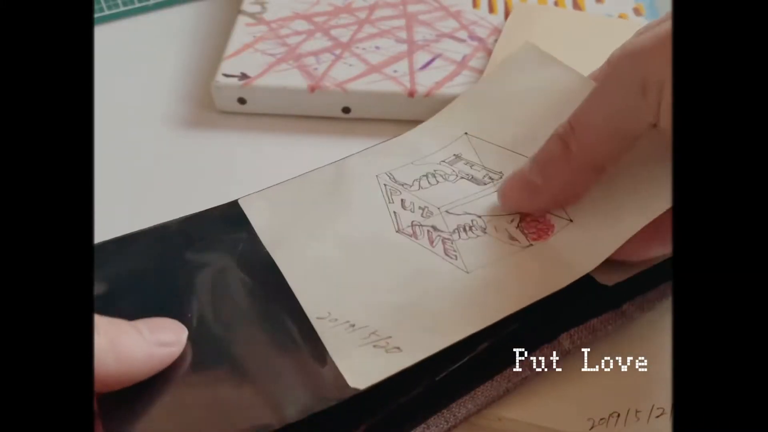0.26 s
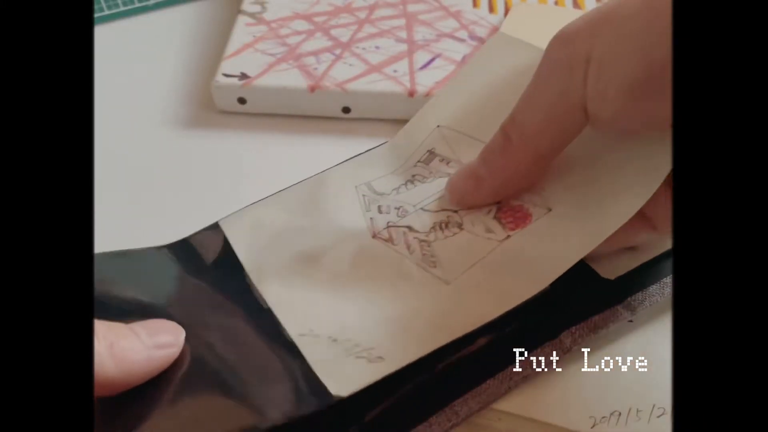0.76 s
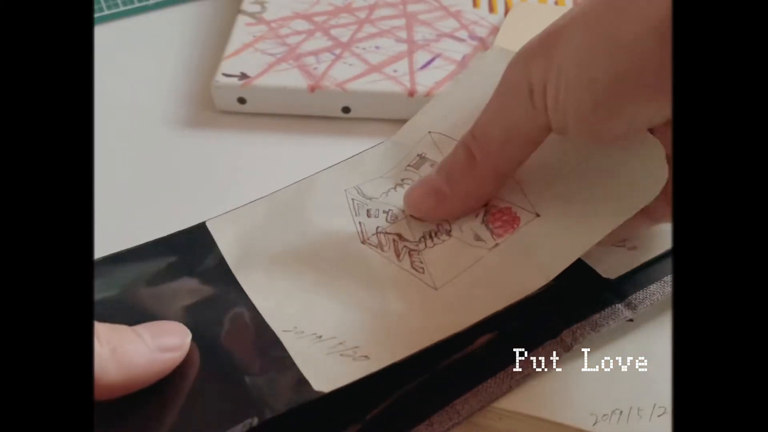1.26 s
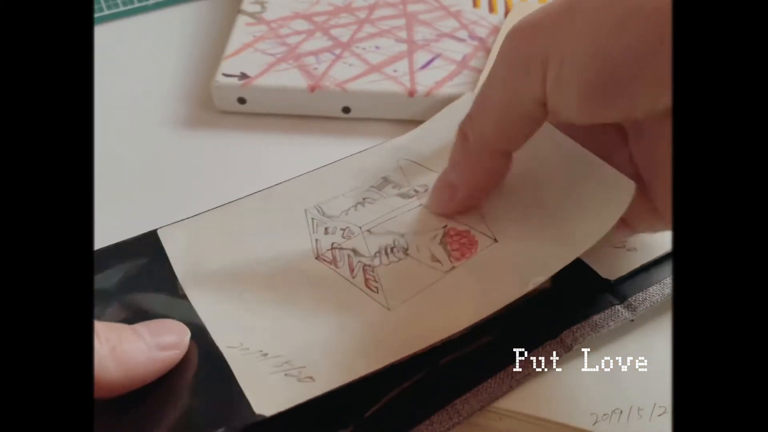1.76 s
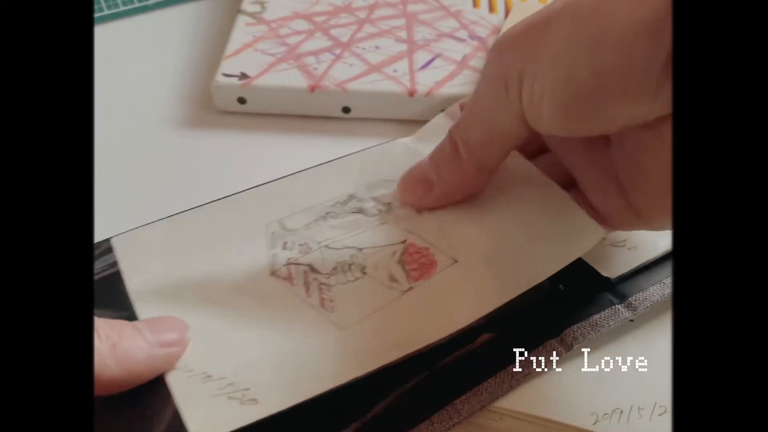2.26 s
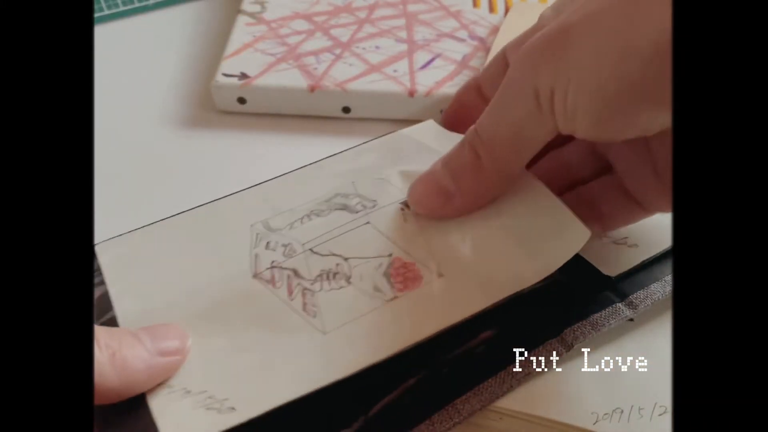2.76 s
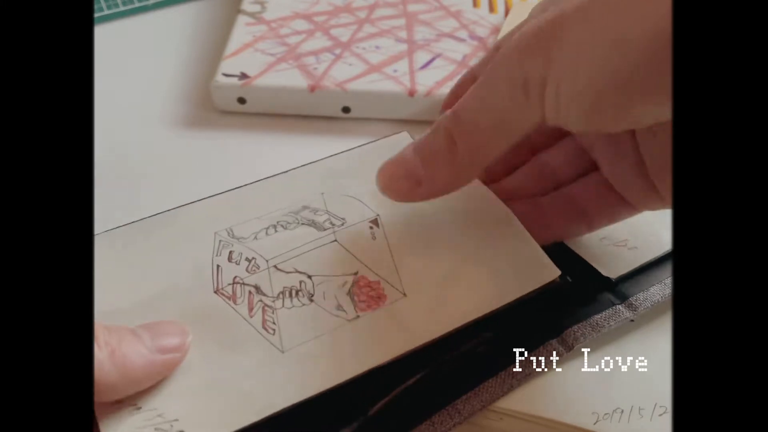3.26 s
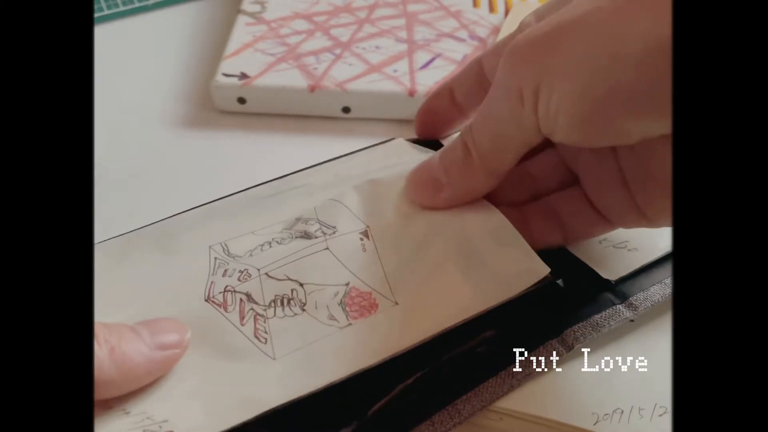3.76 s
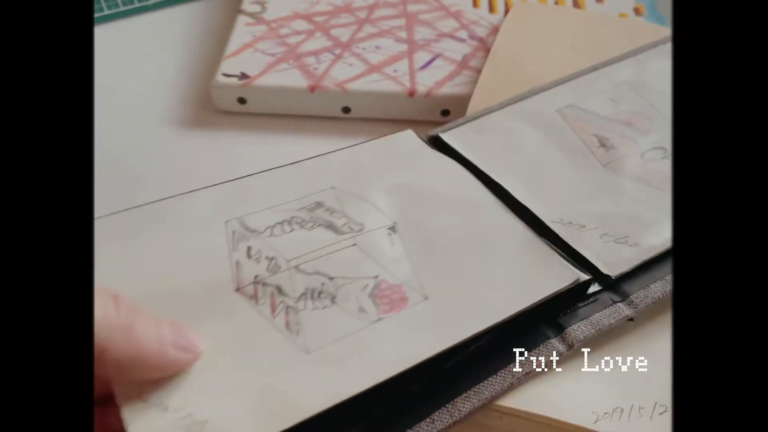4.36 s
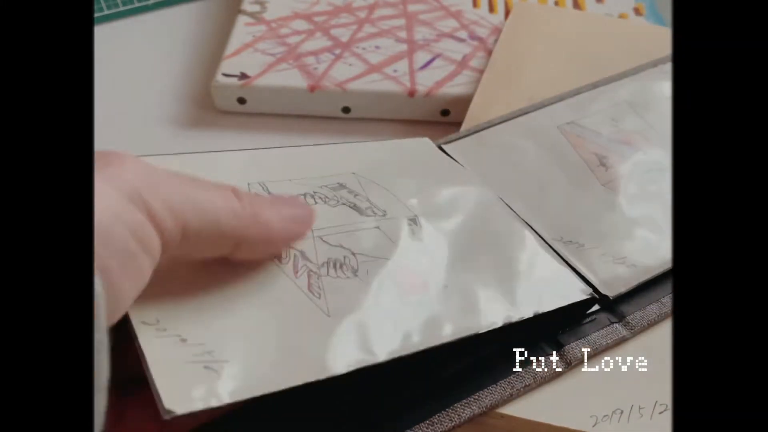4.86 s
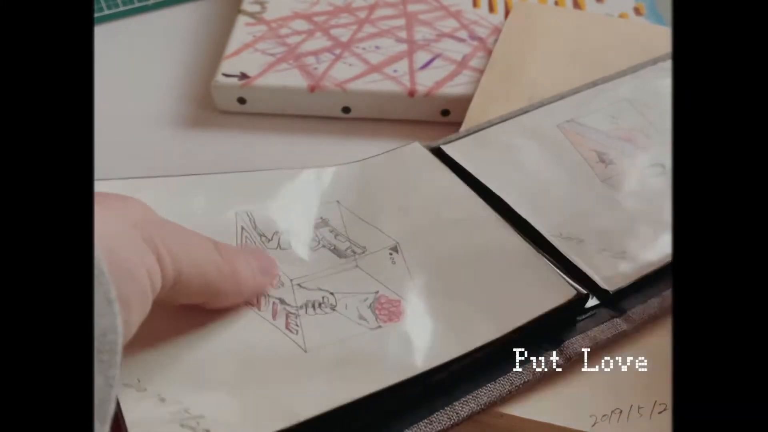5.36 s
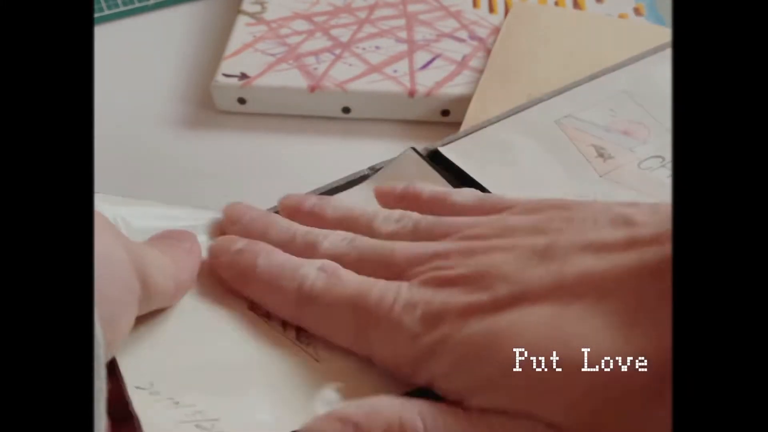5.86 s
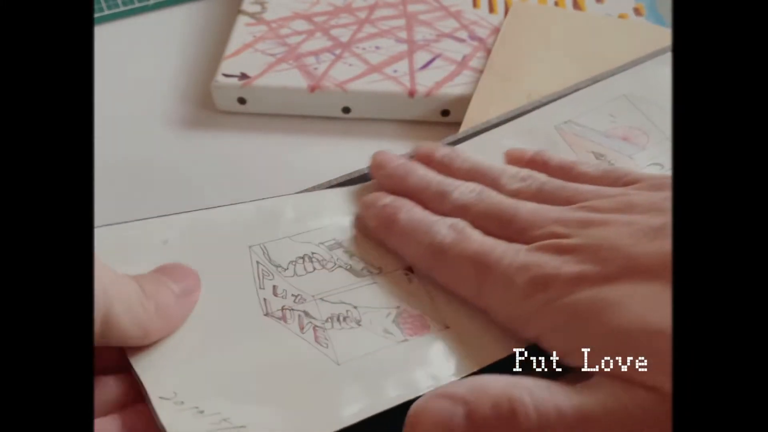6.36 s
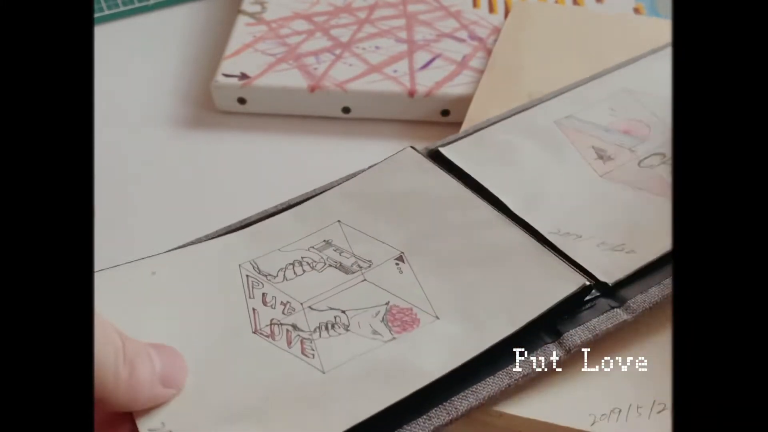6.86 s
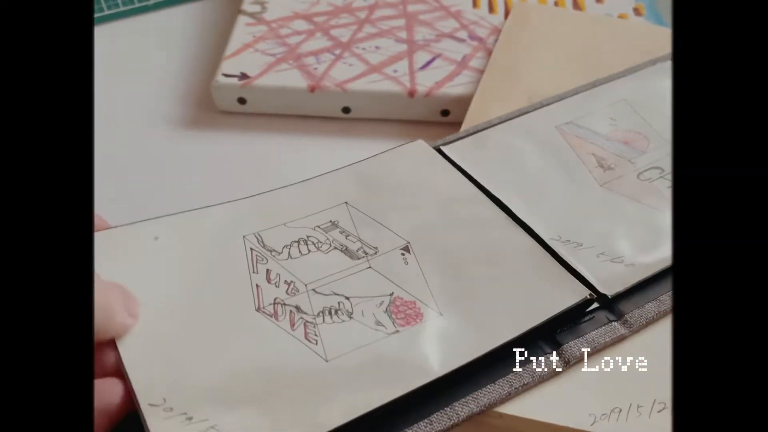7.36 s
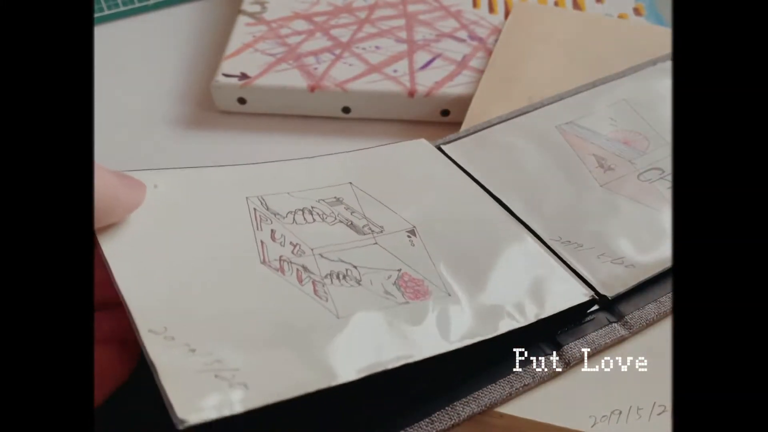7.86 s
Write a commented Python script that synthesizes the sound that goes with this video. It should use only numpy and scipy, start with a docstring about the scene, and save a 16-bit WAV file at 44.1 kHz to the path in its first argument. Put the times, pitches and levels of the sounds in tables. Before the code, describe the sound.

A close stereo microphone hears paper handling on a table in a quiet room, over an uneven low motor hum and a faint, high insect whirr from far outside. A short rustle opens, then from 0.3 s sharp creases snap among dry, scratchy slides, loudest around 0.4, 1.15 and 1.25 s. Irregular pushes and crackles continue to about 2.8 s, then thin out, with snaps near 3.15 and a crisp one at 3.63 s, and a few more until 4.1 s. A soft knock falls at 4.5 s, light ticks near 5 s, and a firmer dull tap at 5.35 s. Pressing rustles follow from 5.7 s; a bright palm swish swells from 6.1 to 6.46 s, stopping with a knock. Another tap and faint brush come near 6.75 s. Afterwards mostly hum remains, with a tiny rising squeak at 7.25 s, one weak tick at 7.6 s and faint rapid insect clicking until 8 s.

```python
"""Paper sheet into an album sleeve

Close by on a table, hands slide a paper sheet into a plastic album sleeve, then smooth it flat.
Creases snap as short bursts with three rings; grains and friction through paper resonances make the rustle.
Knocks ring the album's low modes; a palm swish, a soft brush and a faint squeak are shaped noise and tone.
A motor hums in harmonics over room noise, and insects far outside whirr as band noise with one clicking caller.
Two microphone ports a few centimetres apart hear the near sounds with a phase shift between them."""
import sys
import numpy as np
from scipy import signal
from scipy.fft import rfft, irfft, next_fast_len
from scipy.io import wavfile

SR = 44100
rng = np.random.default_rng(int(sys.argv[2]) if len(sys.argv) > 2 else 0)


def store_wav(level_fs):
    """Save 16-bit WAV to argv[1]."""
    pcm = np.round(np.clip(np.atleast_2d(level_fs), -1, 1) * 32767)
    wavfile.write(sys.argv[1], SR, pcm.T.astype(np.int16))


N = 357210

# left-right balance of the room: (frequency [Hz], left over right [dB])
AIR_BALANCE = [(60, -3.5), (200, -5.5), (380, -2), (700, -.5), (1300, 0), (15000, 0)]
DULL_HZ, BRIGHT_HZ = 2200, 7500   # borders between dull, main and bright parts
SIDES = np.array([[1], [-1]])   # sign of a left-right difference: left, right


def amp(db):
    """Gain of a level in dB."""
    return 10 ** (np.asarray(db) / 20)


def rms_one(x):
    """Scaled to rms 1."""
    return x / np.sqrt(np.mean(x ** 2) + 1e-20)


def in_time(rows):
    """Each column of a curve table at every sample."""
    s, *columns = np.transpose(rows)
    return [np.interp(np.arange(N) / SR, s, column) for column in columns]


def at_hz(points, hz):
    """A spectrum table read on a log-frequency axis."""
    table_hz, values = np.transpose(points)
    return np.interp(np.log(hz), np.log(table_hz), values)


def drift(rate_hz):
    """Slow chance: noise through a double one-pole low-pass, spread 1."""
    step = 20   # drawn at every 20th sample, then interpolated
    r = np.exp(-2 * np.pi * rate_hz * step / SR)
    slow = signal.lfilter([1], [1, -2 * r, r * r], rng.standard_normal(N // step + 4002))
    slow = rms_one(slow[4000:])   # the filter has settled
    return np.interp(np.arange(N) / step, np.arange(len(slow)), slow)


def band(x, low_hz, high_hz):
    """Band-pass."""
    return signal.sosfilt(signal.butter(2, [low_hz, high_hz], "band", fs=SR, output="sos"), x)


def resonance(x, hz, width_hz):
    """Two-pole resonance with gain 1 on top."""
    r = np.exp(-np.pi * width_hz / SR)
    poles = [1, -2 * r * np.cos(2 * np.pi * hz / SR), r * r]
    return signal.lfilter([(1 - r * r) / 2, 0, (r * r - 1) / 2], poles, x)


def modes(x, table):
    """Broad resonances in parallel with alternating signs."""
    return sum((-1) ** k * amp(level_db) * resonance(x, hz, width_hz)
               for k, (hz, width_hz, level_db) in enumerate(table))


def stroke(start_s, stop_s, first, last, rise_s, fall_s):
    """A value that glides from start to stop, and the gate that opens and closes around it."""
    t = np.arange(N) / SR
    opening, closing = (t - start_s) / rise_s, 1 + (stop_s - t) / fall_s
    gate = np.clip(np.minimum(opening, closing), 0, 1)
    return np.interp(t, [start_s, stop_s], [first, last]), gate ** 2


def air(patchy_db):
    """Half-octave bands of stereo noise, each with its own level, flicker, likeness and balance."""
    # spectrum of room rumble and hiss before scaling to rms 1: (frequency [Hz], relative level [dB per Hz])
    spectrum = [(15, -58), (25, -29), (53, -4.5), (134, -5), (157, -26), (180, 8.5), (249, -7.5),
                (293, -4.5), (373, -20.5), (503, -19), (3430, -34.5), (5000, -40), (6740, -37),
                (10100, -64), (16000, -98)]
    # how alike the channels are: (frequency [Hz], left-right likeness [0-1])
    likeness = [(60, 0.6), (130, 0.87), (290, 0.9), (640, 0.27), (1400, 0.53), (3100, 1), (5000, 1),
                (15000, 1)]
    out, edges = 0, 25 * 2 ** np.arange(0, 9.6, .5)
    white = rng.standard_normal((2, 2, N))   # two pairs, used in turn by neighbouring bands
    for k, (low_hz, high_hz) in enumerate(zip(edges, edges[1:])):
        mid, side = band(white[k % 2], low_hz, high_hz)
        hz = np.sqrt(low_hz * high_hz)
        alike = np.clip(at_hz(likeness, hz), 0, 1)
        lean = amp(at_hz(AIR_BALANCE, hz) / 2 * SIDES)
        pair = np.sqrt(1 + alike) * mid + np.sqrt(1 - alike) * side * SIDES
        out = out + amp(at_hz(spectrum, hz) + patchy_db * drift(2.66)) * lean * pair
    return rms_one(out)


def hum(waver_db, wander_rad):
    """Harmonics of the motor, each wavering in level and phase."""
    # harmonics: (frequency [Hz], level under the motor's own curve [dB])
    harmonics = [(64.7, -5.5), (129.4, -12.5), (194.2, -5.5), (259, -9.5), (323.5, -14)]
    t, out = np.arange(N) / SR, 0
    for hz, level_db in harmonics:
        balance_db = at_hz(AIR_BALANCE, hz) / 2 * SIDES
        tone = np.sin(2 * np.pi * hz * t + wander_rad * drift(3.6))
        out = out + amp(level_db + waver_db * drift(6.8) + balance_db) * tone
    return out


def motor():
    """The hum and the room noise rise and fall together."""
    # motor and room: (time [s], level [dB])
    level = [(0, -49), (.67, -46.5), (1.65, -47.5), (2.9, -48.5), (3.7, -48.5), (5, -49.5), (6.1, -48.5),
             (7, -49), (8.1, -49.5)]
    room = amp(-2.0) * air(patchy_db=1.7)
    return amp(in_time(level)[0]) * (room + hum(waver_db=2.2, wander_rad=0.42))


def insects():
    """A chorus whirrs in a high band; one caller's even clicks show as lines at multiples of their rate."""
    # distant chorus: (time [s], whirr level [dB], amplitude share of the high band [0-1])
    chorus = [(0, -66.5, 0.84), (3.4, -67.5, 1), (5.5, -66.5, 0.95), (6.6, -65, 0.7), (7.0, -67.5, 0.86),
              (8.1, -69.5, 0.8)]
    # one steady caller: (time [s], click rate [clicks per s], level of a line [dB])
    caller = [(6.5, 508, -85), (6.75, 515, -72), (7.3, 530, -71.5), (7.7, 538, -69.5), (8.1, 547, -69.5)]
    whirr_db, share = in_time(chorus)
    rate, caller_db = in_time(caller)
    cycles = np.cumsum(rate / SR) + .016 * drift(45)
    lines = sum(amp(2 * drift(7.2)) * np.sin(2 * np.pi * k * cycles) for k in range(10, 18))
    clicks = amp(caller_db) * band(band(lines, 6250, 7500), 6250, 7500)
    high = band(rng.standard_normal(N), 7000, 8600)
    low = band(rng.standard_normal(N), 5600, 7000)
    low = band(low, 6200, 8500)   # sharpens the lower edge
    share = np.clip(share, 0, 1)
    whirr = share * rms_one(high) + np.sqrt(1 - share ** 2) * rms_one(low)
    return amp(whirr_db) * whirr + clicks


def hiss():
    """Faint smooth microphone hiss at the top, the same in both channels."""
    return amp(-80) * rms_one(band(rng.standard_normal(N), 9500, 15500))


def sliding():
    """Level of the rustle and of its dull and bright parts in dB: the pushes over the creep."""
    # the sheet is pushed or pressed, slides and stops:
    # (start [s], stop [s], level at start [dB], level at stop [dB], extra bright [dB], extra dull [dB])
    pushes = [(-.03, 0.013, -40.5, -45, -4, 3), (0.275, 0.388, -65.5, -47.5, -5, 3.5),
              (0.384, 0.582, -50.5, -60, -15, -18), (0.635, 0.712, -55.5, -57.5, -7, 4),
              (0.78, 0.825, -57, -60, -16, -12), (0.888, 0.981, -51, -53, -6, -25),
              (0.998, 1.082, -59, -58.5, -24, 2.5), (1.129, 1.151, -45.5, -47, -6, 8),
              (1.219, 1.384, -52.5, -60.5, -8, -2), (1.395, 1.532, -54, -54, -8, -5),
              (1.617, 1.746, -49, -59, 0.5, -5), (1.779, 1.841, -65, -65.5, -26, 6.5),
              (1.865, 2.036, -64, -55, -8, -5), (2.038, 2.238, -54, -57, -5, -14),
              (2.325, 2.468, -52, -60.5, 0, -4), (2.554, 2.596, -53, -49, -9, 5),
              (2.62, 2.752, -60, -56, 2, 1.5), (2.772, 2.944, -57, -64.5, -0.5, -12),
              (3.007, 3.122, -64.5, -63, -1, -14), (3.198, 3.309, -63.5, -63, -6, -5),
              (3.631, 3.689, -47.5, -59, 0, -1), (3.7, 3.858, -59.5, -51, -1.5, -4),
              (4.058, 4.119, -63, -59.5, -22, 1.5), (4.255, 4.307, -72.5, -73, 6, -2),
              (4.801, 4.892, -79.5, -76.5, -10, 1), (5.227, 5.452, -68.5, -75, 3, 2),
              (5.676, 5.757, -72, -68, -1, 8.5), (5.772, 5.953, -62, -57.5, -4, -19),
              (5.968, 6.12, -62.5, -63.5, 1, -17), (6.155, 6.463, -69, -58, 3, -17)]
    # slow creep of the sheet under the fingers between pushes: (time [s], level [dB])
    creep = [(0, -60.5), (.2, -76.5), (.45, -63), (2.2, -64), (3.3, -67), (3.5, -81), (4.2, -74.5),
             (5.6, -76.5), (6.2, -64), (6.7, -69.5), (7.0, -79.5), (8.1, -94.5)]
    dull_base_db, dull_follows = -39, 0.36   # the dull part follows this share of the rustle's dB
    bright_offset_db = -1   # the bright part beside the rustle
    main, uneven = amp(in_time(creep)[0]), amp(0.96 * drift(12))
    dull, bright = main, main * amp(bright_offset_db)
    for start_s, stop_s, first_db, last_db, bright_db, dull_db in pushes:
        level_db, gate = stroke(start_s, stop_s, first_db, last_db, rise_s=0.014, fall_s=0.04)
        push = gate * uneven * amp(level_db)
        main = main + push
        bright = bright + push * amp(bright_db + bright_offset_db)
        dull = dull + push * amp(dull_db / dull_follows)   # the share below undoes the division
    main_db, dull_db, bright_db = (20 * np.log10(x) for x in (main, dull, bright))
    return main_db, dull_base_db + dull_follows * dull_db, bright_db


def sheet(x):
    """The resonances of paper in its sleeve."""
    # resonances: (frequency [Hz], width [Hz], level [dB])
    paper = [(714, 233, 10), (1728, 288, 9), (2600, 1930, 0), (3950, 1050, 6.5), (5020, 1270, 4),
             (7320, 1750, 5.5), (9120, 3400, 1.5), (14660, 820, 10)]
    return modes(x, paper)


def rustle(main_db, dull_db, bright_db, grains_per_s, size_db, clump_db, unlike):
    """Fibres catch and slip: clumped grains over smooth friction, through the sheet."""
    # ring of the air in the open sleeve: (time [s], level beside the other dull sound [dB])
    pocket_ring = [(0, -6), (2.6, -16), (2.8, 9), (2.95, 5.5), (3.05, -10), (3.2, -3), (3.3, -27),
                   (3.6, 2.5), (4.15, 1.5), (4.3, -3.5), (8.1, -6.5)]
    born = rng.random(N) < grains_per_s * amp(clump_db * drift(60)) / SR
    size = amp(size_db * np.minimum(rng.exponential(1, N), 3.5))
    grains = born * size * rng.choice([-1, 1], N)
    # the wide contact reaches each port differently
    spread = resonance(rng.standard_normal((2, N)), 2600, 2000)
    friction = 1.3 * rms_one(grains) + rng.standard_normal(N) + unlike * spread
    friction = friction * amp(1.6 * drift(27))
    rub = sheet(friction)
    pocket = resonance(resonance(friction, 1650, 400), 1650, 400)
    pocket_gain = amp(in_time(pocket_ring)[0] + 1.5 * drift(25))
    dull = rms_one(band(rub, 360, DULL_HZ)) + pocket_gain * rms_one(pocket)
    dull = amp(dull_db) * rms_one(dull)
    main = amp(main_db + 1.2 * drift(15)) * rms_one(band(rub, DULL_HZ, BRIGHT_HZ))
    bright = amp(bright_db + 1.2 * drift(3.9)) * rms_one(band(rub, BRIGHT_HZ, 13240))
    return dull - main + bright   # neighbouring parts have opposite signs


def crackles(moving_db, count):
    """Small creases snap at random, more often where the sheet moves harder; rows like those of the snaps."""
    likely = np.cumsum(amp(moving_db[:N - SR // 10]))
    u, g = rng.random((count, 4)), rng.standard_normal((count, 6))
    at = np.searchsorted(likely, u[:, 0] * likely[-1])
    # -47 dB where the rustle is at -55 dB, following 0.6 of its dB from there
    peak_db = -47 + 0.6 * (moving_db[at] + 55) + 3.5 * g[:, 0]
    thump_db, edge_db, pan_db = -18 + 4 * g[:, 1], -14 + 5 * g[:, 4], 4 + 3 * g[:, 5]
    low_hz, low_db = 1400 + 450 * u[:, 1], -7 + 5 * g[:, 2]
    mid_hz, mid_db = 2400 + 800 * u[:, 2], -6 + 4 * g[:, 3]
    high_hz, high_db = 3500 + 2500 * u[:, 3] ** 2, np.full(count, -3)
    return np.transpose([at / SR, peak_db, thump_db, low_hz, low_db, mid_hz, mid_db,
                         high_hz, high_db, edge_db, pan_db])


def knocks(contact_s, uneven):
    """The album is tapped or meets the table: a soft, uneven contact rings its low modes."""
    # taps: (time [s], peak level [dB])
    taps = [(0.247, -40), (3.341, -46), (4.532, -42), (5.352, -32), (5.659, -45), (6.461, -35),
            (6.684, -47), (6.763, -34.5)]
    # modes of the album on the table: (frequency [Hz], width [Hz], level [dB])
    album = [(303, 20, 8), (369, 26, 8), (500, 64, 1.5), (696, 100, 1), (1180, 330, -3.5)]
    length = 8000
    out, t = np.zeros(N + length), np.arange(length) / SR
    for s, peak_db in taps:
        push = (1 + uneven * rng.standard_normal(length)) * t / contact_s * np.exp(-t / contact_s)
        knock = modes(band(push, 150, 1400), album)
        at = round(s * SR)
        out[at:at + length] += amp(peak_db) * knock / np.abs(knock).max()
    return out[:N]


def snaps(small_creases, rise_s, tail_s, tail_db, edge_tail_db, ring_db, unlike):
    """A crease buckles in a millisecond burst of tiny cracks; the panels beside it ring briefly at three pitches."""
    # creases: (time [s], reference level [dB], then beside that level: thump at 366-990 Hz [dB],
    # low ring [Hz], [dB], middle ring [Hz], [dB], high ring [Hz], [dB],
    # edge over 7.5 kHz [dB]; left over right in the middle and high parts [dB])
    creases = [(0.3134, -35, -29, 1670, -1.5, 2500, -19, 5600, -16, -26, 4),
               (0.3346, -31, -15, 1600, -7, 2470, -17, 5660, -19, -26, 0.5),
               (0.3513, -21.5, -19, 1790, -19, 2580, -12, 5570, -13, -16, 1.5),
               (0.3747, -13.5, -44, 1550, -15, 2590, -18, 3700, -6, 0.5, 0),
               (0.379, -4.5, -23.5, 1770, -49, 2720, -8.5, 5700, -3.5, -33, 2.5),
               (0.5058, -28, -13.5, 1650, -16, 3370, -23, 3480, -7, -26, 8),
               (0.5204, -34, -20, 1710, -10, 3000, -22, 4010, -8, -6, 1.5),
               (0.632, -25.5, -18, 1660, -8, 2750, -3, 5040, -3, -4.5, 5),
               (0.6496, -11.5, -23, 1410, -12.5, 3220, -14.5, 3960, -7, -40, 3),
               (0.6684, -20.5, -26, 1110, -23, 3230, -20, 3980, -6, -18, 11),
               (0.7043, -23, -38, 1690, -23, 2720, -18, 3700, -6.5, -6.5, 7),
               (0.7936, -24.5, -20, 910, -20, 2200, -19, 4200, -6.5, -15, 6),
               (0.8095, -25, -23, 1710, -22, 2990, -27, 6340, -12, 0, 2),
               (0.8674, -35, -27, 1030, -12, 2110, -8, 4600, -2, -5, 9),
               (0.8869, -11.5, -20.5, 1620, -14.5, 2830, -10.5, 4140, -5, -23, 1),
               (0.9433, -29, -29, 1650, -7.5, 3030, -7, 3910, -1, -19, 3),
               (0.9811, -20, -36, 1130, -13, 3180, -32, 4280, -4.5, -8, 11),
               (1.0265, -20.5, -12, 1570, -10, 2550, -19, 3820, -7.5, -34, 1),
               (1.0525, -24, -22, 1820, -9, 3000, -5.5, 3470, -12, -23, 5),
               (1.0664, -20, -22, 1990, -16, 3280, -23, 3610, -8, -15, 2.0),
               (1.0725, -27.5, -5, 1670, -6, 2200, -6, 3440, -10, -23, -1),
               (1.0832, -16.5, -27, 1730, -19, 3170, -18, 3420, -4, -32, 5),
               (1.0984, -24.5, -8.5, 1570, -5, 2230, -10, 3700, -11, -11, 4),
               (1.1364, -26, -7, 1620, -9, 3030, 3, 4480, 4.5, -8, 1),
               (1.1452, -3, -22, 2080, -16, 2510, -13, 4883, -5, -10, -0.5),
               (1.2383, 0, -29.5, 1700, -27.5, 3200, -20, 4400, -16.5, -40, 0),
               (1.3991, -13.5, -26, 1590, -26.5, 3360, -30, 4400, -8.5, -31, 6),
               (1.4341, -36, -20, 1590, -17, 2940, -14, 3670, -12, -21, 3.0),
               (1.4815, -11.5, -25, 1694, -6.5, 2530, -22, 3650, -9, -26, 1),
               (1.6068, -11, -17, 1870, -13, 3160, -13, 4500, -8, -32, 2),
               (1.6488, -28.5, -10.5, 1650, -12, 2550, -20, 5540, -6, -17, -7),
               (1.7444, -35, -13, 1830, -11, 2480, -19, 3600, -6, -14, 11),
               (1.767, -29, -14, 1530, -11, 2200, -25, 5350, -5, -14, 5),
               (1.773, -17.5, -32, 1720, -11, 2440, -28, 5440, -6.5, -15.5, 3),
               (1.8136, -30.5, -9, 1570, -6, 2200, -11, 4080, -10, -33, 10),
               (1.819, -18, -19, 1710, -11.5, 2650, -10, 3570, -14.5, -38, -1),
               (1.8402, -30.5, -16, 1560, -6, 2420, -19, 4120, -23, -29, -0.5),
               (1.9287, -31, -24, 2140, -18, 3060, -12, 5800, -8, -21, 3.5),
               (1.9405, -29, -10, 2120, -15, 2430, -15, 3480, -4, -14, 12),
               (1.9688, -20, -31, 1650, -13, 2300, -18, 4630, -11, -10, 5),
               (2.0456, -11, -26, 1154, -16.5, 2600, -13, 4280, -4.5, -4, 7),
               (2.1273, -29.5, -16, 1560, -8.5, 3120, -19, 4670, -16, -24, 4),
               (2.227, -31, -27, 1610, -17, 3280, -24, 4000, -3.5, -25, 1.5),
               (2.2468, -35, -5.5, 1560, -7, 2500, -25, 3530, -17, -21, 1.0),
               (2.3585, -23, -12.5, 1030, -8.5, 2980, -22, 5760, -13, -24, 7),
               (2.3721, -15, -18, 1660, -13.5, 2570, -16, 4300, -7.5, -25, 4),
               (2.4395, -39, -9, 1600, -13, 2600, -17, 4300, -10, -22, 5),
               (2.5265, -41, -8, 1500, -10, 2800, -16, 3700, -10, -25, 3),
               (2.5664, -12, -16.5, 1460, -8.5, 2200, -18, 3690, -7, -39, 6),
               (2.585, -14, -19, 1840, -17, 2510, -18, 5620, -13, -23, 3),
               (2.604, -37, -12, 1340, -2, 2790, -12, 3450, -17, -17, 3),
               (2.6227, -23, -17, 1390, -19, 2200, -12, 6300, -10, -9, 6),
               (2.6436, -19, -14.5, 1190, -23, 2780, -18, 4280, -8, -15, 7),
               (2.7267, -17.5, -21.5, 1580, -19, 2410, -17, 3470, -4.5, -12, 8),
               (2.7548, -27, -16, 1610, -11, 2260, -14, 3360, -12, -20, 0.5),
               (3.1309, -10.5, -33, 1910, -22.5, 2330, -31, 4000, -7, -28, 0),
               (3.1607, -23, -35, 1730, -12.5, 2380, -22, 4470, -5, -25, 8),
               (3.1978, -33.5, -18, 1120, -9, 2540, -17, 5860, -12, -19, 4.0),
               (3.215, -26, -16, 1680, -6.5, 3350, -18, 3610, -9, -30, 14),
               (3.2204, -33, -4, 1610, -10, 2570, -21, 3950, -22, -24, 0.5),
               (3.4114, -41, -19, 2040, -17, 2520, -12, 3680, -6.5, -19, 9),
               (3.6277, -19.5, -12, 2290, -11.5, 3270, -27, 7160, 1.5, -15, 5),
               (3.6286, -6.5, -24, 1650, -19, 2960, -19.5, 3630, -12.5, -5.5, 11),
               (3.711, -23, -33, 1550, -24, 3070, -25, 4370, -16, -2, 7),
               (3.7898, -19, -22, 1590, -16, 3270, -27, 3980, -10, -16, 6),
               (3.81, -13, -44, 1890, -18, 2480, -25, 4450, -3, -5, 21),
               (3.8426, -25.5, -11, 1610, -14, 2230, -24, 4530, -16, -24, 5),
               (4.0608, -27, -26, 1600, -9.5, 3150, -16, 3770, -7, -11, 8),
               (4.07, -23, -38, 1630, -15, 2800, -13, 4870, -3, -22, 5),
               (4.0958, -20.5, -27, 1680, -10, 2880, -14, 3670, -8.5, -31, 9),
               (4.1053, -20.5, -28, 1680, -12.5, 2820, -15, 4040, -13, -36, 4),
               (4.8206, -42, 0.5, 950, -9, 2360, -23, 3700, -9, -16, 3.5),
               (4.859, -33, -7, 1050, -13, 3260, -18, 3450, -9, -21, 4),
               (5.0018, -23.5, -14.5, 1040, -16, 3260, -18.5, 4400, -11.5, -20, 10),
               (5.0998, -30.5, -28, 1060, -22, 3290, -24, 6550, -5.5, -27, 5),
               (5.356, -41.5, -20, 1200, -12, 2600, -16, 4670, -4, -25, 3),
               (5.7344, -29, -13, 1000, -10, 2650, -9, 3460, -9.5, -30, 3.5),
               (5.7782, -29.5, -24, 1660, -20, 2290, -17, 4000, -6.5, -6, 5),
               (5.823, -32.5, -30, 1380, -16, 2540, -13, 3720, -7, -24, 10),
               (5.8691, -35, -17, 1430, -17, 2370, -10, 4650, -5, -18, 1.5),
               (5.8955, -32.5, -10, 1070, -9.5, 2660, -20, 3560, -4, -2, 1.5),
               (5.9327, -19, -37, 2100, -15.5, 2400, -15, 3790, -8.5, -31, 3.5),
               (5.9504, -35, -24, 931, -28, 2610, -12, 4900, -7, -24, 8),
               (6.0382, -23, -11, 1350, -12, 2940, -13, 3940, -5, -25, 2),
               (6.1918, -32, -9, 990, -23, 2400, -12, 4100, -6.5, -25, 5),
               (6.4286, -30.5, -18, 1680, -10, 2370, -15, 5700, -8, -17, 6),
               (6.4615, -25, -9.5, 1610, -12.5, 2330, -13, 5700, -9, -11, 6),
               (6.6318, -34.5, -10.5, 912, -22, 2320, -14, 7300, -9, -18, 2),
               (7.5986, -41, -3, 1080, -10, 3000, -16, 6960, -30, -28, 2.0)]
    crack_s, edge_s = 0.00063, 0.00043   # decay of the burst of cracks and of its bright edge
    ring_s, ring_shrinks = 0.0014, 0.44   # decay at 2 kHz and the power by which it shrinks with pitch
    ring_spread = 0.11   # most that each channel's ring is shifted from the middle [turns]
    split_hz, length = 3300, 1100   # border between middle and high ring; samples in a snap
    rows = np.vstack([creases, small_creases])
    columns = np.transpose(rows)[:, :, None, None]   # axes of the sound: snap, channel, sample
    (s, peak_db, thump_db, low_hz, low_db, mid_hz, mid_db,
     high_hz, high_db, edge_db, pan_db) = columns
    t = np.arange(length) / SR
    rise = (1 - np.exp(-t / rise_s)) ** 2
    tail = np.exp(-t / tail_s)
    chance = rng.standard_normal((len(rows), 3, length))
    turns = rng.random((len(rows), 6, 1))
    shared, separate = chance[:, :1], chance[:, 1:]
    cracks = (shared + unlike * separate) * rise * (np.exp(-t / crack_s) + amp(tail_db) * tail)
    edge = shared * rise * (np.exp(-t / edge_s) + amp(edge_tail_db) * tail)
    body = sheet(cracks)
    lean = amp(pan_db / 2 * SIDES)
    parts = [(band(cracks, 366, 990), thump_db), (band(sheet(edge), BRIGHT_HZ, 11370), edge_db)]
    rings = [(low_hz, low_db, 900, DULL_HZ), (mid_hz, mid_db, DULL_HZ, split_hz),
             (high_hz, high_db, split_hz, BRIGHT_HZ)]
    for k, (hz, level_db, bottom_hz, top_hz) in enumerate(rings):
        shift = ring_spread * (2 * turns[:, k + 3:k + 4] - 1) * SIDES
        turn = turns[:, k:k + 1] + shift
        decay = np.exp(-t / (ring_s * (2000 / hz) ** ring_shrinks))
        ring = rise * decay * np.sin(2 * np.pi * (hz * t + turn))
        part = band(body, bottom_hz, top_hz) + amp(ring_db) * ring
        parts.append((part * (lean if k else 1), level_db))   # the low part stays centred
    sound = 0
    for part, level_db in parts:
        peak = np.abs(part.mean(axis=1, keepdims=True)).max(axis=2, keepdims=True)
        sound = sound + amp(peak_db + level_db) * part / peak
    out = np.zeros((2, N + length))
    for at, snap in zip(np.round(s.ravel() * SR).astype(int), sound):
        out[:, at:at + length] += snap
    return out[:, :N]


def brush():
    """Skin on plastic: a bright swish under the palm, a soft brush as the hand leaves."""
    # the palm swipes across, louder until it stops; then the hand lifts off
    palm_db, swipe = stroke(6.1, 6.462, -66, -47.5, rise_s=.1, fall_s=.012)
    lift_db, leave = stroke(6.68, 6.9, -62, -61.5, rise_s=.1, fall_s=.1)
    palm = rms_one(band(rng.standard_normal(N), 4000, 8500))
    lift = rms_one(band(rng.standard_normal((2, N)), 1950, 2900))
    return swipe * amp(palm_db) * palm + leave * amp(lift_db + .9 * drift(26)) * lift


def squeak():
    """A faint, thin, slightly unsteady tone that glides upward."""
    # one squeak: (start [s], stop [s], pitch at start [Hz], pitch at stop [Hz], level [dB])
    glide = (7.24, 7.34, 3480, 3540, -71)
    start_s, stop_s, first_hz, last_hz, level_db = glide
    hz, gate = stroke(start_s, stop_s, first_hz, last_hz, rise_s=0.036, fall_s=.04)
    tone = np.sin(2 * np.pi * np.cumsum(hz) / SR + .8 * drift(40))
    return gate * amp(level_db + 3.5 * drift(30)) * tone


def ports(x):
    """The two microphone ports: left and right get opposite halves of the phase shift."""
    # a source on the table: (frequency [Hz], phase by which left leads [rad])
    left_leads = [(0, 1), (700, -0.08), (1700, 0.3), (3100, 1.14), (3900, 0), (5200, 1.58), (7900, -3.5),
                  (8600, -4), (10600, -6), (12500, -6.5), (14000, -9.5), (22050, -12)]
    size = next_fast_len(N)
    lead = np.interp(np.arange(size // 2 + 1) * SR / size, *np.transpose(left_leads))
    return irfft(rfft(x, size) * np.exp(.5j * lead * SIDES), size)[:, :N]


def scene():
    """Near handling through the two ports, over the room."""
    main_db, dull_db, bright_db = sliding()
    near = rustle(main_db, dull_db, bright_db, grains_per_s=2200, size_db=3.0, clump_db=4.0, unlike=1.87)
    near = near + knocks(contact_s=0.0014, uneven=1.83) + brush()
    near = near + snaps(crackles(main_db, count=80), rise_s=0.0004, tail_s=0.0056, tail_db=-21.5,
                        edge_tail_db=-29.5, ring_db=-4.5, unlike=0.46)
    return ports(near) + motor() + insects() + squeak() + hiss()


def record(dry):
    """A steep low-pass cuts the top, 70 dB down from 17 kHz."""
    return signal.sosfilt(signal.cheby2(22, 70, 17000, fs=SR, output="sos"), dry)


dry = scene()
out = record(dry)
store_wav(out)
```